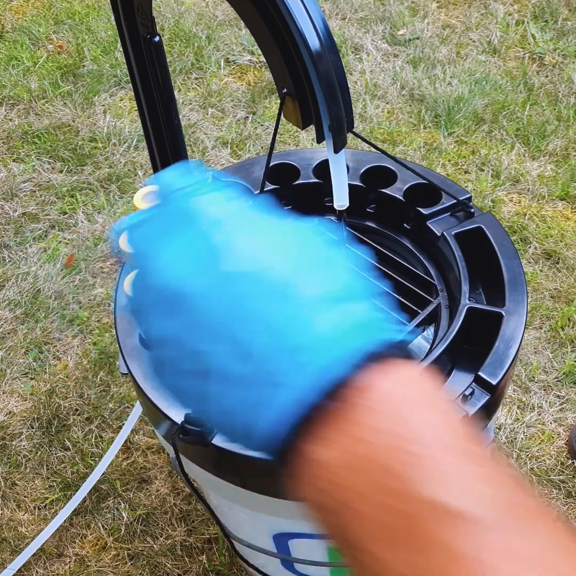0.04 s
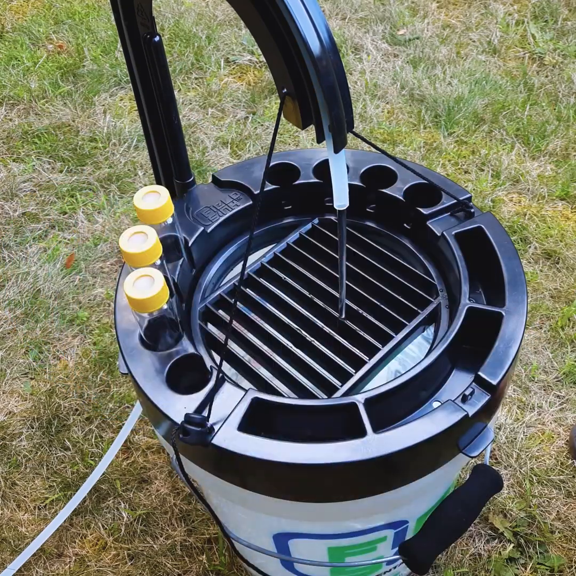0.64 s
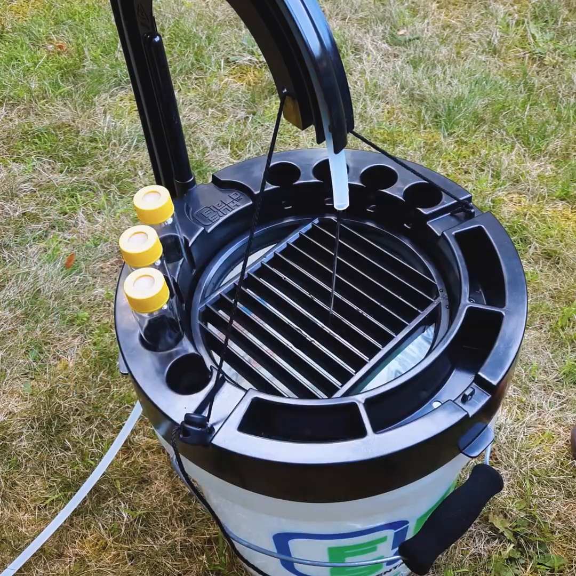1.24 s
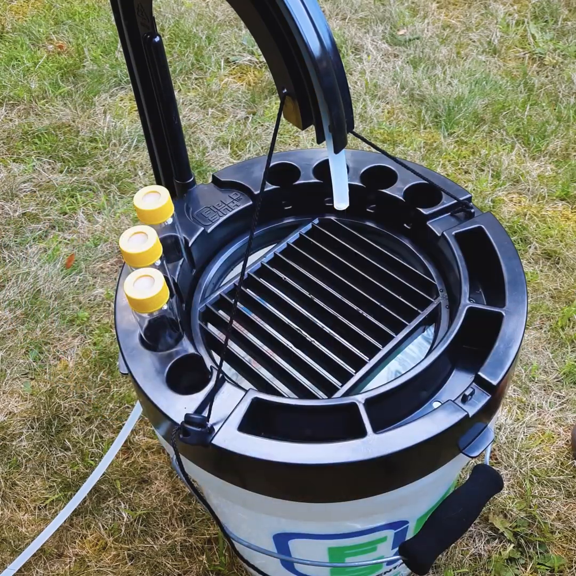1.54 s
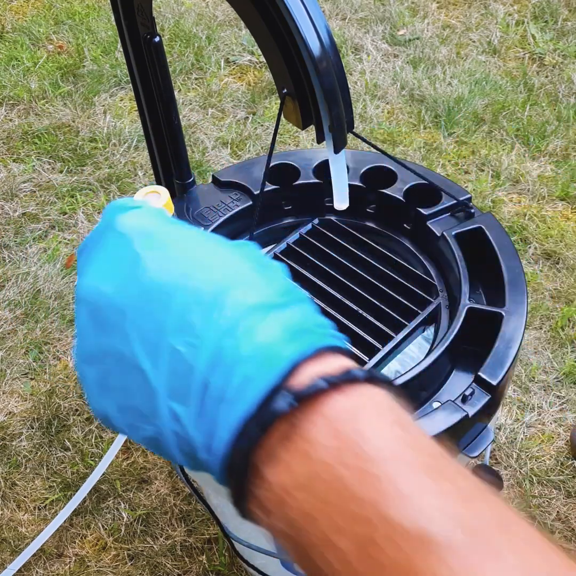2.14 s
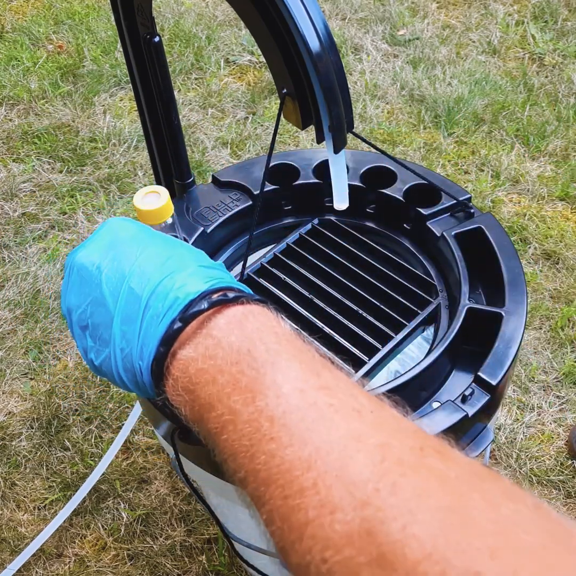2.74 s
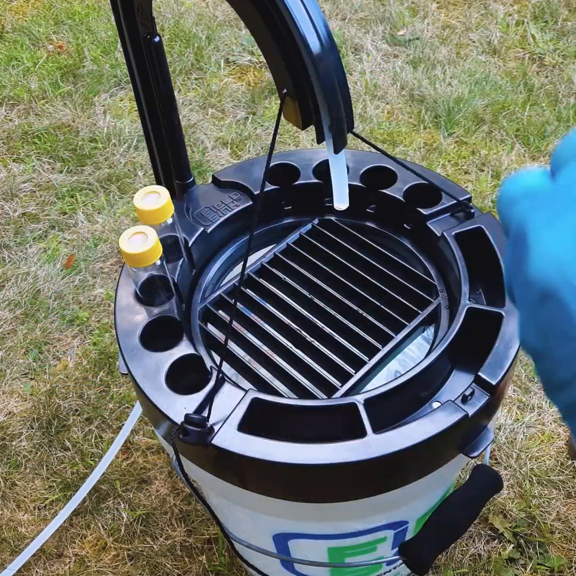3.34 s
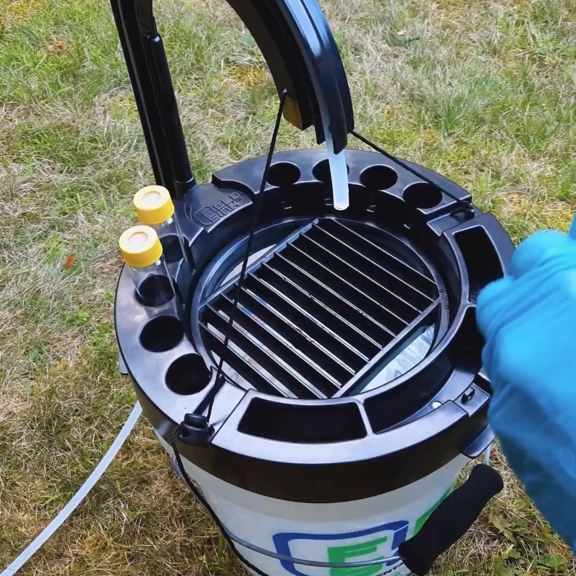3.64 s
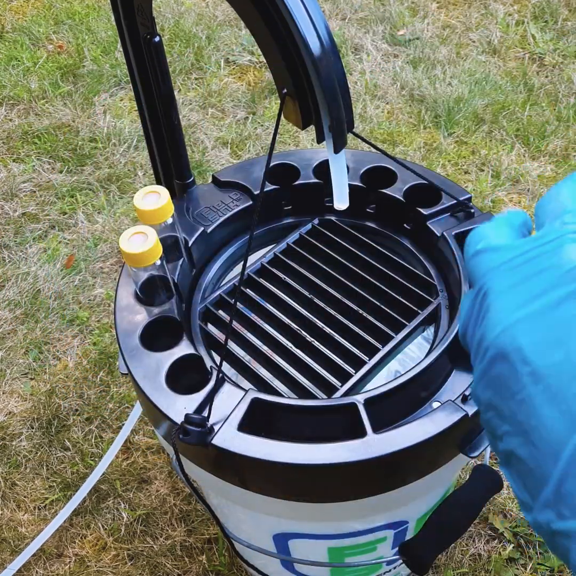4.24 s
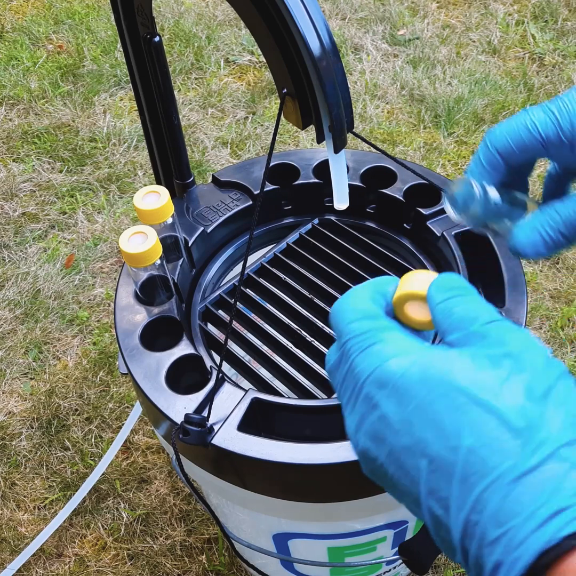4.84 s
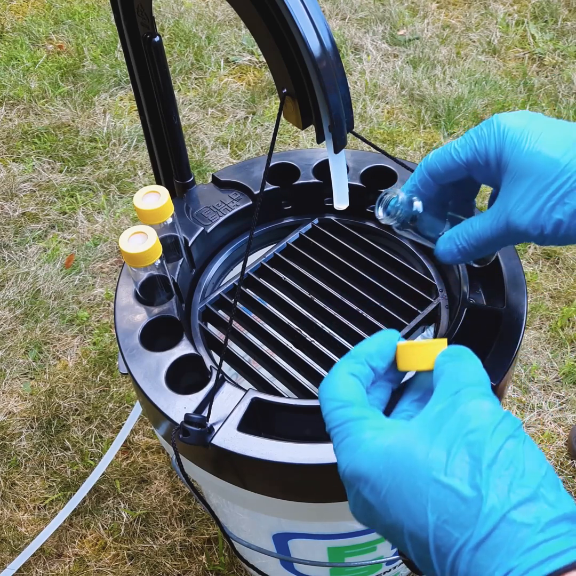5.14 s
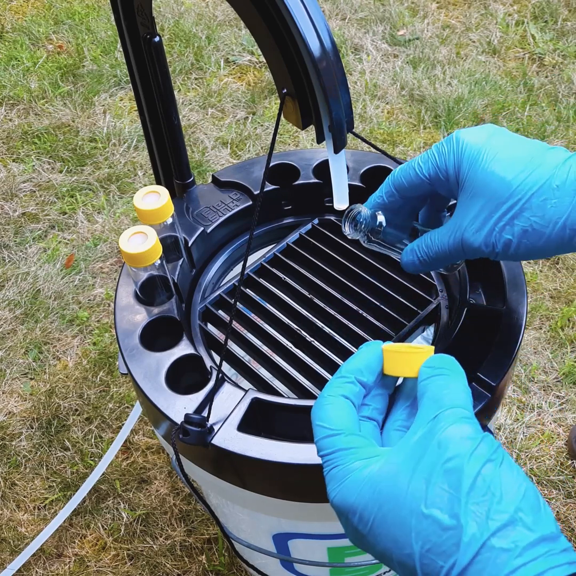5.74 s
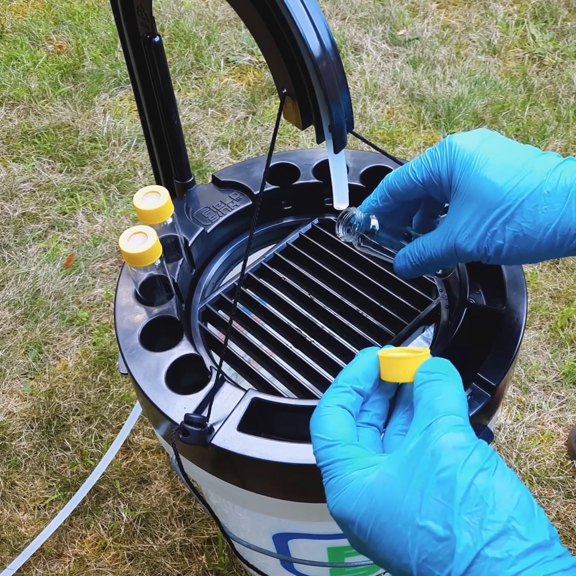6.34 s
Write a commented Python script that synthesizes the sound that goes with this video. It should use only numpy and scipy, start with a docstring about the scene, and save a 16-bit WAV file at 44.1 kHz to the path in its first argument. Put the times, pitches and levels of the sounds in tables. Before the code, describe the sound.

A thin stream gurgles into a plastic bucket and drips away; then one sharp knock and faint ticks, with distant traffic and insects.

```python
"""First a thin stream from a pump's tube gurgles into a plastic bucket: bubbles ring, the air inside
hums and spray spatters on a metal grate. By two seconds the water has died away in drips.
A far vehicle swells and passes, and a small bird starts to whistle faintly. Near three seconds a gloved
hand knocks a sample vial out of the bucket's rim, then works at its cap with ticks and rustles.
All the while, insects buzz on the lawn around the bucket."""
import sys
import numpy as np
from scipy import signal
from scipy.fft import rfft, irfft
from scipy.io import wavfile

SR = 44100
rng = np.random.default_rng(int(sys.argv[2]) if len(sys.argv) > 2 else 0)


def bounce(signal):
    """Save signal as a 16-bit WAV file at the path given by the first command-line argument."""
    frames = np.transpose(np.atleast_2d(signal))
    limited = np.clip(frames, -1, 1)
    pcm = np.round(limited * 32767).astype(np.int16)
    wavfile.write(sys.argv[1], SR, pcm)


N = 281384

# Levels in the tables are relative. A ring time (t60) is how long a sound takes to fade by 60 dB.
# Tone of the water's sounds. Each row: frequency in Hz, level in dB.
GURGLE_TONE = [(71, -33.5), (120, -22), (200, -15.5), (255, -11.5), (348, -7), (386, -9), (460, -5),
               (625, -2.5), (759, -10.5), (849, -21.5), (931, -38), (1150, -8), (1430, -3), (2420, -16)]
SPLASH_TONE = [(440, -42), (680, 9), (854, -3.5), (930, 0.5), (1060, -6), (1160, -6), (1400, -10.5),
               (1600, -13), (1790, -0.5), (1930, -25.5), (2200, -6.5), (2600, -5), (3000, -1.5), (3480, -9),
               (4200, -10.5), (5460, -45)]
SPRAY_TONE = [(1470, -15), (2200, -14), (2650, -7), (3180, -16), (3770, -9.5), (4580, -7.5), (5200, -7),
              (6200, -8), (7420, -11.5), (8400, -5), (9220, -17.5), (10500, -13), (12300, -11.5),
              (14800, -10), (16000, -15)]
SLAP_TONE = [(1200, -4.5), (2600, 4), (5000, 8.5), (8300, 4), (9800, -10), (12500, 2), (16000, -1)]
# Notes of the bucket's air, metal grate and plastic rim.
# Each row: pitch in Hz, level in dB, ring time in seconds.
AIR_NOTES = [(394, 0, .2), (640, -1, .2), (926, -13, .15), (1157, -12, .12)]
GRATE_NOTES = [(1157, 9, .1), (1812, 8, .07), (2182, 7, .08), (2304, 6, .07), (2633, 7, .08),
               (2838, 1, .06), (3225, -1, .05), (3574, 3, .06), (4708, -1, .03), (5945, -3, .04),
               (7850, -5, .02)]
RIM_NOTES = [(191, -8.5, 0.23), (427, -3, 0.25), (736, -6, 0.22), (1303, -6, 0.072), (1327, 5.5, 0.071),
             (1495, 5, 0.034), (2164, -4.5, 0.05), (3190, 4, 0.03), (3370, -24, 0.051), (5930, -4, 0.015),
             (8200, -6, 0.026)]
# How hard the wandering stream hits the grate. Each row: time in seconds, level in dB.
SPATTER_LEVELS = [(0, -78), (0.1, -60.5), (0.18, -49), (0.34, -50.5), (0.47, -40.5), (0.63, -40.5),
                  (0.7, -40.5), (0.78, -40.5), (0.825, -45.5), (0.88, -42), (0.95, -42), (1.05, -46),
                  (1.14, -48.5), (1.19, -50), (1.32, -52.5), (1.5, -59.5), (1.63, -68.5), (2, -77),
                  (2.4, -130)]
# The loudest bubbles. Each row: start in seconds, pitch in Hz, level in dB, ring time in seconds.
LOUD_BUBBLES = [(0.02, 551, -28, 0.1), (0.084, 557, -28.5, 0.16), (0.131, 1450, -26, 0.015),
                (0.134, 2320, -26, 0.026), (0.145, 588, -29, 0.15), (0.155, 750, -30, 0.17),
                (0.198, 717, -30, 0.099), (0.228, 1780, -38, 0.027), (0.243, 2660, -35, 0.037),
                (0.236, 615, -30, 0.16), (0.26, 2780, -29, 0.036), (0.279, 513, -26, 0.13),
                (0.342, 1810, -34, 0.042), (0.3465, 638, -22, 0.067), (0.392, 1830, -31.5, 0.024),
                (0.473, 624, -25.5, 0.18), (0.527, 1790, -29, 0.023), (0.533, 2380, -20.5, 0.021),
                (0.538, 671, -24.5, 0.074), (0.605, 410, -25.5, 0.041), (0.667, 426, -24.5, 0.046),
                (0.683, 2690, -28, 0.018), (0.747, 2500, -24.5, 0.012), (0.791, 375, -21.5, 0.047),
                (0.866, 664, -31, 0.064), (0.889, 624, -25.5, 0.078), (0.9228, 2724, -13, 0.027),
                (0.925, 3640, -24, 0.043), (0.928, 2980, -25.5, 0.023), (0.984, 1410, -34.5, .025),
                (0.991, 1740, -38, .02), (0.9982, 2450, -19.5, 0.022), (1.013, 630, -28.5, 0.098),
                (1.106, 692, -25, 0.065), (1.117, 676, -25, 0.032), (1.109, 2520, -32, 0.024),
                (1.173, 1740, -33, .015), (1.203, 2220, -41, 0.031), (1.268, 642, -40, 0.18),
                (1.301, 623, -35, 0.12), (1.332, 639, -33.5, 0.067), (1.361, 745, -20, 0.035),
                (1.397, 1360, -37, 0.059)]
# The loudest drops and last drips. Each row: start in seconds, level in dB, brightness in dB per octave,
# pitch of the splat in Hz, level of the splat against the slap in dB.
LOUD_DROPS = [(0.154, -31.5, -6, 3160, -16), (0.176, -39.5, 3, 6500, 2), (0.211, -32.5, -3, 4230, -24),
              (0.238, -35.5, 9, 8100, -1.5), (0.262, -34, 12, 7800, 10.5), (0.298, -32, 6, 6000, -20),
              (0.327, -31.5, 7, 6200, -20), (0.364, -34, 2, 8270, 5.5), (0.371, -30, 3, 12400, -2),
              (0.392, -20, 2, 4900, -8.5), (0.431, -31, -2, 6000, -6), (0.455, -25.5, 0, 8300, -1.5),
              (0.475, -26.5, 0, 5500, -14), (0.5167, -29, -4.5, 6340, -3), (0.576, -29, -2, 7000, -10),
              (0.618, -35, 1, 13800, -9), (0.665, -27, -11.5, 10900, -13), (0.68, -31.5, 13, 12500, 1),
              (0.7, -32.5, -9, 4830, 6), (0.733, -39, 3, 4580, -4), (0.76, -32.5, 1, 4860, 2),
              (0.774, -30.5, 9, 12100, -10), (0.851, -33.5, -1, 5960, 7.5), (0.868, -31.5, -5, 4530, -1.5),
              (0.898, -36, -6, 6120, 3), (0.912, -32, 2.5, 5540, -6.5), (0.934, -24, 0, 3420, -15),
              (0.975, -34.5, 3, 4870, 5.5), (1.0742, -34.5, 6.5, 8300, -5), (1.159, -34, -1, 3860, 2),
              (1.172, -29.5, 1.5, 3200, -7.5), (1.199, -32, -5.5, 3470, -6), (1.2525, -29, 6, 2670, -3),
              (1.293, -29, -4, 6300, -24), (1.3549, -31.5, -0.5, 5270, -23), (1.424, -36.5, -2.5, 5100, -4),
              (1.436, -42, 4, 4400, 0), (1.4595, -33, 0, 7900, -2.5), (1.576, -35, 9, 4320, -6.5),
              (1.6314, -50, 5, 13900, -9), (1.666, -35.5, 8, 13000, -20), (1.7137, -45, 9, 10000, -0.5),
              (1.754, -51.5, 11, 12000, -4)]
# The vial knocks and rattles. Each row: start in seconds, level in dB, treble limit in Hz.
VIAL_KNOCKS = [(2.795, -19.5, 11000), (2.8008, -13, 11000), (2.902, -31.5, 1590), (2.912, -36, 1590),
               (2.921, -43, 1600), (2.943, -39, 1700), (2.956, -39.5, 1600), (2.967, -38, 1590),
               (4.355, -42, 1600), (4.388, -42, 1000), (4.581, -50, 4970), (4.62, -36, 700)]
# Cap and vial tick. Each row: start in seconds, level in dB, treble limit in Hz, brightest band in Hz.
CAP_TICKS = [(3.7743, -43.5, 16000, 7650), (3.8339, -41.5, 6000, 3000), (3.841, -38.5, 13000, 4260),
             (4.0261, -35, 16000, 5430), (4.0677, -40.5, 6000, 4430), (5.398, -55, 12000, 4330)]
# Strokes of glove and sleeve. Each row: middle in seconds, length in seconds, level in dB.
GLOVE_STROKES = [(1.535, 0.11, -55.5), (1.83, 0.11, -64), (1.987, 0.029, -55), (2.027, 0.086, -56),
                 (2.266, 0.077, -64), (2.42, 0.67, -74.5), (3.215, 0.065, -66), (3.495, 1, -73),
                 (3.777, 0.052, -58), (4.37, 0.13, -73.5), (4.614, 0.15, -69), (4.905, 0.25, -73)]
# Tone of the hand's sounds. Each row: frequency in Hz, level in dB.
KNOCK_TONE = [(71, -68), (120, -58), (173, -9), (251, -31), (436, -6), (712, -1), (968, -7), (1190, -0.5),
              (1520, 0.5), (1750, -10), (3050, -9), (3660, -15.5), (4500, -33), (6110, -21), (16000, -59)]
TICK_TONE = [(710, 4), (1200, 5.5), (1770, -8), (3250, 1), (4860, -18.5), (5410, -2), (6720, -11),
             (14800, -3), (16000, -14)]
GLOVE_TONE = [(1180, -26), (2000, 8), (2810, -6), (3090, 4.5), (4770, 8), (9490, 6.5), (12100, 9),
              (16000, 4.5)]
# Sounds that build, hold and fade. Each lists: level in dB, start and end of the hold in seconds,
# rise and fall in dB per second.
GURGLE_SWELL = (-38, 0, 0.48, 20, 18)
HOLLOW_SWELL = (-37.5, 0.035, 0.28, 400, 90)
DRONE_SWELL = (-48.5, 2, 3, 19.5, 12.5)
TYRE_SWELL = (-51, 2, 2.5, 12, 4.5)
# The far engine's strength. Each row: time in seconds, deep rumble in dB, hum in dB.
ENGINE_LEVELS = [(0, -49.5, -45), (0.27, -54, -58.5), (0.4, -50.5, -52), (1.2, -54.5, -57),
                 (2.25, -47.5, -58.5), (2.95, -52, -58.5), (4.4, -54.5, -61), (5.0, -61.5, -63),
                 (5.4, -72.5, -64.5), (5.8, -54.5, -61), (6.05, -75, -60.5), (6.38, -59, -64)]
# Tone of the vehicle's sounds. Each row: frequency in Hz, level in dB.
RUMBLE_TONE = [(30, -22), (40, -19), (50, 1), (60, -3), (70, 4.5), (80, -4), (100, -8)]
HUM_TONE = [(90, -5), (118, 1.5), (165, -5.5), (215, -15), (290, -12)]
DRONE_TONE = [(100, -63), (170, -7.5), (255, -31.5), (310, -0.5), (323, 1), (400, -6), (438, -10.5),
              (560, -14.5), (617, 0.5), (676, -11.5), (800, -16.5), (1040, -42), (1760, -120)]
TYRE_TONE = [(350, -14.5), (600, -10), (780, -1.5), (863, -6), (1110, -11), (1320, -18), (1480, -14.5),
             (2340, -32.5), (3000, -43), (3900, -60), (6600, -120)]
# Tone of the insects and the open air. Each row: frequency in Hz, level in dB.
TRILL_TONE = [(2850, -28), (3100, -18), (3200, -6.5), (3290, -10), (3360, -25), (3700, -50.5)]
CHORUS_TONE = [(4100, -38), (4300, -13), (4600, -10), (4800, 4.5), (5300, 7.5), (5700, 0), (6000, -5),
               (6300, -19)]
OPEN_AIR_TONE = [(1500, 8), (3000, -4.5), (7000, -8.5), (12000, -13.5), (16000, -17)]
# The bird's notes. Each row: start in seconds, length in seconds, pitch in Hz, level in dB.
BIRD_NOTES = [(2.182, 0.18, 10830, -73), (2.27, .08, 8100, -86), (2.531, 0.062, 10600, -78),
              (4.906, .11, 7500, -88)]

HIT_SAMPLES = 12000  # room for one short sound
THINNING = 0.41  # how steeply the droplets grow fewer as the flow ebbs
HOLLOW_HZ, HOLLOW_SAG_HZ_PER_S = 400.6, 58
WOBBLE_CYCLES, WOBBLE_PITCH_SHARE, WOBBLE_DB = 2.2, .05, 2.5  # a bubble changes shape every few cycles
TRILL_RATE_HZ = 37
WARBLE_HZ, WARBLE_SHARE, ARCH_SHARE = 11, .018, 0.07  # the shares are parts of the bird's pitch
TOP_HZ = 15800


def stream():
    """The jet churns the water in the bucket and breaks into spray on the grate."""
    flow = level_curve(SPATTER_LEVELS, column=1)
    return gurgle() + (splash() + spray(flow)) * flow * pan(-3.5)


def gurgle():
    """Big bubbles ring low and stir the air in the bucket."""
    bubbles = froth(124.3, 967, cycles=10, spread_db=5.5, count=1800)
    bubbles = bucket(bubbles, t60=0.098, echo_db=-2.5, likeness=0.13)
    bubbles = colour(bubbles + gain(-20) * convolve(bubbles, ring(AIR_NOTES)), GURGLE_TONE)
    bubbles = np.roll(bubbles, -SR // 10, axis=1)  # the water is already running
    return unit_flow(bubbles) * swell(*GURGLE_SWELL) * between(0, 0.98, fade=0.35) * pan(-1.8)


def splash():
    """Middle-sized bubbles blend into a splashing sound."""
    bubbles = froth(764, 4200, cycles=11, spread_db=14.5, count=1100)
    bubbles = bucket(bubbles, t60=0.063, echo_db=-2.5, likeness=0.086)
    return unit_flow(colour(bubbles, SPLASH_TONE)) * gain(-1.5)


def spray(flow):
    """Droplets crack on the grate and scatter between the walls while tiny bubbles fizz."""
    drops_per_s = 450 * np.clip((flow / flow.max()) ** THINNING, .25, 1)
    drop_fade = gain(2) * decay(0.003) + decay(0.024) + gain(-7) * decay(0.1)
    energy = convolve(patter(drops_per_s, spread_db=7) ** 2, drop_fade ** 2)
    cracks = unit(noise(0.16) * np.sqrt(np.abs(energy)))
    fizz = froth(3540, 9000, cycles=22, spread_db=18, count=700)
    fizz = unit_flow(bucket(fizz, t60=0.03, echo_db=5, likeness=0))
    impacts = cracks + gain(-4.5) * fizz
    return unit_flow(colour(impacts + gain(-6.5) * convolve(impacts, ring(GRATE_NOTES)), SPRAY_TONE))


def hollow_note():
    """The first gush keeps the air in the bucket humming on one wavering note that sags a little."""
    t = np.arange(N) / SR
    phase = 2 * np.pi * np.cumsum(HOLLOW_HZ - HOLLOW_SAG_HZ_PER_S * t) / SR + 0.79 * wander(45 * t)
    ear_shift = np.array([[0], [1.1]])
    note = np.sqrt(2) * np.sin(phase + ear_shift) * gain(1.6 * wander(45 * t))
    return note * swell(*HOLLOW_SWELL)


def plops():
    """Single loud bubbles: deep ones set the bucket's air humming, high ones splash and stir the grate."""
    deep, high = np.zeros((2, N))
    splashes = np.zeros((2, N))
    for start, hz, db, t60 in LOUD_BUBBLES:
        plop = gain(db) * bubble(hz, t60, rise=0.033, onset_cycles=0.92)
        if hz < 1000:
            add(deep, start, plop)
        else:
            add(high, start, plop)
            add(splashes, start, gain(db - 11) * snap(hz, t60=.05, width=.35))
    deep_echo = bucket(deep, t60=0.11, echo_db=-10, likeness=0.36)
    deep = deep_echo + gain(-52) * convolve(deep, ring(AIR_NOTES))
    high_echo = bucket(high, t60=0.057, echo_db=-4.5, likeness=0.4)
    high = high_echo + gain(-17.5) * convolve(high, ring(GRATE_NOTES))
    return deep * gain(-2.5) * pan(-6.5) + (high * gain(-0.5) + splashes) * pan(-0.74)


def drops():
    """Each drop slaps a bar, splats in a band of its own and scatters droplets that land just after."""
    out = np.zeros((2, N))
    for start, db, tilt_db, splat_hz, splat_db in LOUD_DROPS:
        scatter = gain(-11) * decay(0.13) * (.5 + flecks(per_s=600, t60=0.008))
        slap = noise(0.49, HIT_SAMPLES) * (decay(0.038) + scatter)
        tone = [(hz, level + tilt_db * np.log2(hz / splat_hz)) for hz, level in SLAP_TONE]
        slap = colour(slap + gain(-13.5) * convolve(slap, ring(GRATE_NOTES)), tone)
        splat = gain(splat_db) * snap(splat_hz, t60=0.04, width=.2)
        add(out, start, gain(db) * (unit_hit(slap) + splat))
    return out * gain(-0.7) * pan(-4.2)


def froth(low_hz, high_hz, cycles, spread_db, count):
    """A swarm of bubbles over the first two seconds, each ringing for roughly `cycles` cycles."""
    out = np.zeros(N)
    for k, (when, pitch, strength, life) in enumerate(rng.random((count, 4))):
        hz = low_hz * (high_hz / low_hz) ** pitch
        note = bubble(hz, t60=cycles * (.5 + life) / hz, rise=0.041)
        add(out, 2 * (k + when) / count, gain(spread_db * strength) * hz * note)
    return out


def bubble(hz, t60, rise, onset_cycles=0.45):
    """A bubble rings unsteadily, its pitch climbing by the share `rise` as it nears the surface."""
    t = np.arange(int(t60 * SR) + 2) / SR
    shape_changes = hz * t / WOBBLE_CYCLES
    pitch = hz * (1 + rise * (t / t60 - .15) + WOBBLE_PITCH_SHARE * wander(shape_changes))
    attack = 1 - np.exp(-hz * t / onset_cycles)
    level = attack * decay(t60, len(t)) * gain(WOBBLE_DB * wander(shape_changes))
    return level * np.sin(2 * np.pi * np.cumsum(pitch) / SR)


def bucket(x, t60, echo_db, likeness):
    """A sound plus its many quick echoes between the bucket's walls."""
    echoes = noise(likeness, HIT_SAMPLES) * decay(t60)
    echoes[:, :60] = 0  # the gap before the first echo
    return x + gain(echo_db) * convolve(x, echoes / np.sqrt(np.sum(echoes ** 2) / 2))


def vial_knocks():
    """The vial catches in its socket; the rim cracks, rings and chatters, duller at a soft touch."""
    out = np.zeros((2, N))
    rim = unit_hit(ring(RIM_NOTES))
    for start, db, treble_hz in VIAL_KNOCKS:
        crack = noise(0.16, HIT_SAMPLES) * (decay(0.065) + gain(-30) * decay(0.51))
        crack = unit_hit(colour(crack, KNOCK_TONE))
        chatter = noise(0.099, HIT_SAMPLES) * decay(0.13) * flecks(per_s=1500, t60=.003)
        chatter = unit_hit(colour(chatter, SLAP_TONE))
        knock = gain(-2.5) * crack + gain(-7) * rim + gain(-23) * chatter
        add(out, start, gain(db) * soften(knock, treble_hz))
    return out * pan(-2)


def cap_ticks():
    """The plastic cap and the vial tick dryly, each tick brightest in its own band."""
    out = np.zeros((2, N))
    for start, db, treble_hz, band_hz in CAP_TICKS:
        burst = noise(.2, HIT_SAMPLES) * (decay(.012) + gain(-18) * decay(.15))
        tick = unit_hit(soften(colour(burst, TICK_TONE), treble_hz))
        add(out, start, gain(db - 4.5) * (tick + gain(-6) * snap(band_hz, t60=0.034, width=0.27)))
    return out * pan(-10)


def glove_rustle():
    """Glove and sleeve rub; each stroke swells and fades evenly about its middle."""
    t = np.arange(N) / SR
    power = sum(gain(db) ** 2 * np.exp(-(2 * (t - middle) / length) ** 2)
                for middle, length, db in GLOVE_STROKES)
    return unit(colour(noise(0.028), GLOVE_TONE)) * np.sqrt(power) * gain(-3.5) * pan(-10)


def traffic():
    """A far vehicle nears and leaves: engine rumble and hum, road drone and tyre noise."""
    rumble = unit(colour(noise(1), RUMBLE_TONE)) * level_curve(ENGINE_LEVELS, column=1) * gain(1.5)
    hum = unit(colour(noise(0.91), HUM_TONE)) * level_curve(ENGINE_LEVELS, column=2)
    drone = unit(colour(noise(0.91), DRONE_TONE))
    tyres = unit(colour(delay_left(noise(0.16), samples=-19), TYRE_TONE))
    # steady traffic behind the vehicle keeps these two from fading out
    drone *= np.hypot(swell(*DRONE_SWELL), gain(-74))
    tyres *= np.hypot(swell(*TYRE_SWELL), gain(-65))
    return rumble * pan(-1.5) + hum * pan(-1.4) + drone * pan(-1.9) + tyres * pan(-4)


def insects():
    """One insect trills with regular wing strokes; many others blend into a hiss."""
    drift = wander(4 * np.arange(N) / SR)
    stroke = np.cumsum(TRILL_RATE_HZ * (1 + .005 * drift)) / SR
    # a loud closing stroke that falls in pitch, then a weak opening stroke
    wings = np.sin(np.pi * stroke) ** 4 + .3 * np.cos(np.pi * stroke) ** 8
    scrape_hz = 3270 - 400 * (stroke % 1 - .5)
    scrape = np.sin(2 * np.pi * np.cumsum(scrape_hz) / SR)
    trill = unit(wings * scrape) * gain(-77 + 0.31 * drift)
    rasp = unit(colour(noise(0.049), TRILL_TONE)) * gain(-74.5)
    chorus = unit(colour(noise(0.042), CHORUS_TONE)) * gain(-68.5)
    return (trill + rasp) * pan(-8.5) + chorus


def bird():
    """Very high, faint whistles, each an arch in level and in wavering pitch."""
    out = np.zeros((2, N))
    for start, length, hz, db in BIRD_NOTES:
        ends = np.linspace(-1, 1, int(length * SR)) ** 4  # 1 at both ends, 0 in the middle
        warble = WARBLE_SHARE * np.cos(2 * np.pi * WARBLE_HZ * np.arange(len(ends)) / SR)
        phase = 2 * np.pi * np.cumsum(hz * (1 - ARCH_SHARE * ends - warble)) / SR
        add(out, start, gain(db) * (1 - ends) * np.sin(phase))
    return out * pan(-31)


def open_air():
    """The faint, steady hiss of the outdoors."""
    return unit(colour(noise(0.04), OPEN_AIR_TONE)) * gain(-76.5) * pan(-1.1)


def ring(notes):
    """A struck thing's notes fade within 0.2 seconds; higher ones reach the two ears out of step."""
    t = np.arange(HIT_SAMPLES) / SR
    out = 0
    for hz, db, t60 in notes:
        ear_shift = rng.uniform(-0.058, 1) * min(hz / 5000, 1.5) * np.array([[1], [-1]])
        out = out + gain(db) * decay(min(t60, .2)) * np.sin(2 * np.pi * hz * t + ear_shift)
    return out / np.sqrt(np.sum(out ** 2) / 2)


def snap(hz, t60, width):
    """A short burst of noise in one band, whose width is a share of `hz`."""
    band = signal.iirpeak(hz, 1 / width, fs=SR)
    burst = noise(0.23, HIT_SAMPLES) * decay(t60)
    return unit_hit(signal.lfilter(*band, signal.lfilter(*band, burst)))


def patter(per_s, spread_db):
    """Random tiny hits of uneven size, equally strong overall however often they come."""
    hits = rng.random(N) < per_s / SR
    signs = rng.choice([-1, 1], N)
    sizes = gain(spread_db * np.clip(rng.standard_normal(N), -2, 2))
    return unit(hits / np.sqrt(per_s) * signs * sizes)


def flecks(per_s, t60):
    """The level of a quick run of tiny, uneven touches."""
    energy = rng.exponential(size=HIT_SAMPLES) ** 2 * (rng.random(HIT_SAMPLES) < per_s / SR)
    return np.sqrt(np.abs(convolve(energy, decay(t60))))


def noise(likeness, size=N):
    """Stereo hiss: likeness 1 is the same in both ears, 0 is unrelated."""
    mid, side = rng.standard_normal((2, size))
    return (np.sqrt(1 + likeness) * mid + np.sqrt(1 - likeness) * side * np.array([[1], [-1]])) / np.sqrt(2)


def wander(steps):
    """Glide to a new random value at each whole step."""
    values = rng.standard_normal(int(steps[-1]) + 2)
    return np.interp(steps, np.arange(len(values)), values)


def colour(x, tone, size=8192):
    """Shape a sound with a tone table, cutting steeply beyond the table's ends."""
    hz, db = np.transpose(tone)
    octave = np.log2(np.maximum(np.arange(size // 2 + 1) * SR / size, 1))
    known = np.log2(hz)
    outside = np.abs(octave - np.clip(octave, known[0], known[-1]))
    gain_db = np.maximum(np.interp(octave, known, db) - 36 * outside, -90)
    # fold the filter so that it rings only after a hit, never before
    cepstrum = irfft(np.log(gain(gain_db)))
    cepstrum[1:size // 2] *= 2
    cepstrum[size // 2 + 1:] = 0
    return convolve(x, irfft(np.exp(rfft(cepstrum))))


def soften(x, hz):
    """Turn down the treble above `hz`."""
    return signal.lfilter(*signal.butter(2, hz, fs=SR), x)


def convolve(x, response):
    """Let every sample set off a response, keeping the sound's length."""
    x = np.atleast_2d(x)
    return signal.fftconvolve(x, np.atleast_2d(response), axes=1)[:, :x.shape[1]]


def swell(db, full_s, until_s, rise, fall):
    """A level that rises, holds and falls, the slopes in dB per second."""
    t = np.arange(N) / SR
    return gain(db - rise * np.maximum(full_s - t, 0) - fall * np.maximum(t - until_s, 0))


def level_curve(table, column):
    """A level that follows one dB column of a table through time."""
    rows = np.array(table)
    return gain(np.interp(np.arange(N) / SR, rows[:, 0], rows[:, column]))


def between(start, end, fade):
    """Fully on from start to end, fading outside them."""
    t = np.arange(N) / SR
    return np.clip((t - start) / fade + 1, 0, 1) * np.clip((end - t) / fade + 1, 0, 1)


def decay(t60, size=HIT_SAMPLES):
    """A fade of 60 dB every `t60` seconds."""
    return np.exp(-np.log(1000) * np.arange(size) / SR / t60)


def gain(db):
    """Turn decibels into a multiplier."""
    return 10 ** (np.asarray(db) / 20)


def unit(x):
    """Scale to an average strength (rms) of 1."""
    return x / np.sqrt(np.mean(x ** 2))


def unit_flow(x):
    """Scale to strength 1 over the two seconds of flow."""
    return x / np.sqrt(np.mean(x[..., :2 * SR] ** 2))


def unit_hit(x):
    """Scale a hit by its first 10 ms, so that it peaks near 1."""
    return x / (3 * np.sqrt(np.mean(x[..., :SR // 100] ** 2)))


def pan(db):
    """Make the left side `db` louder than the right; negative leans right."""
    return gain(np.array([[db], [-db]]) / 2)


def delay_left(x, samples):
    """Sound from the right reaches the left ear later; from the left (negative), sooner."""
    return np.stack([np.roll(x[0], samples), x[1]])


def add(track, start_s, sound):
    """Mix a short sound into a track."""
    first = int(start_s * SR)
    count = min(sound.shape[-1], N - first)
    track[..., first:first + count] += sound[..., :count]


def scene():
    """Water, hand and the outdoors together."""
    water = delay_left(stream() + hollow_note() + plops() + drops(), samples=4)
    hand = delay_left(vial_knocks(), samples=2) + cap_ticks() + glove_rustle()
    return water + hand + traffic() + insects() + bird() + open_air()


def record(dry):
    """Cut away the treble above TOP_HZ."""
    return signal.sosfilt(signal.ellip(10, .2, 70, TOP_HZ, fs=SR, output="sos"), dry)


dry = scene()
out = record(dry)
bounce(out)
```